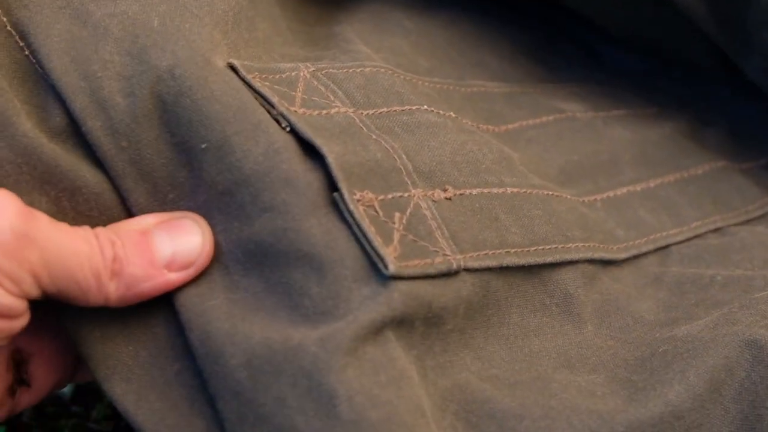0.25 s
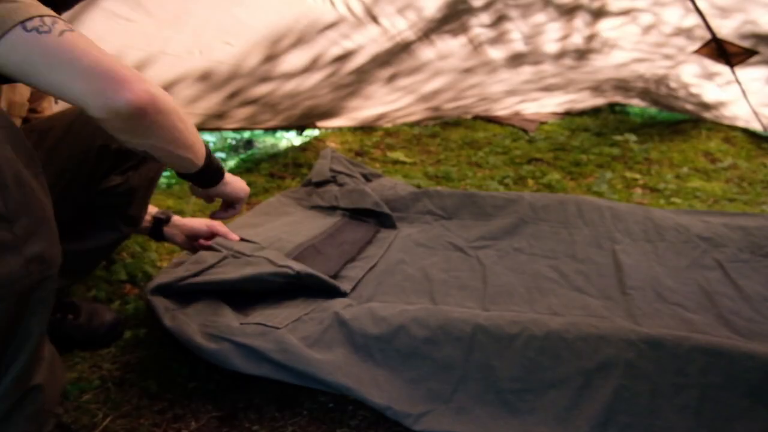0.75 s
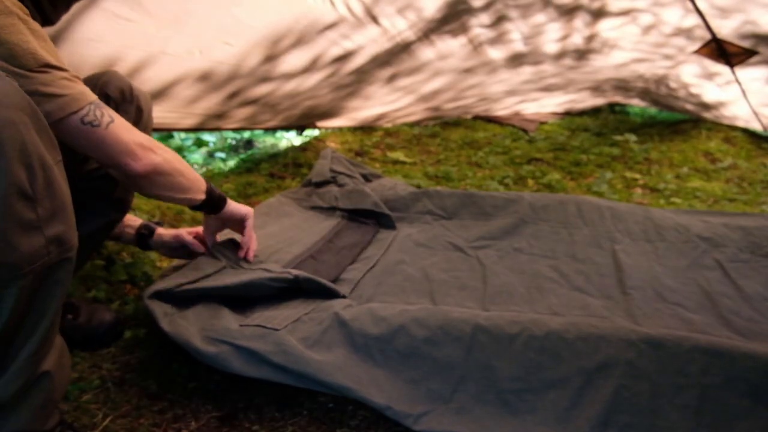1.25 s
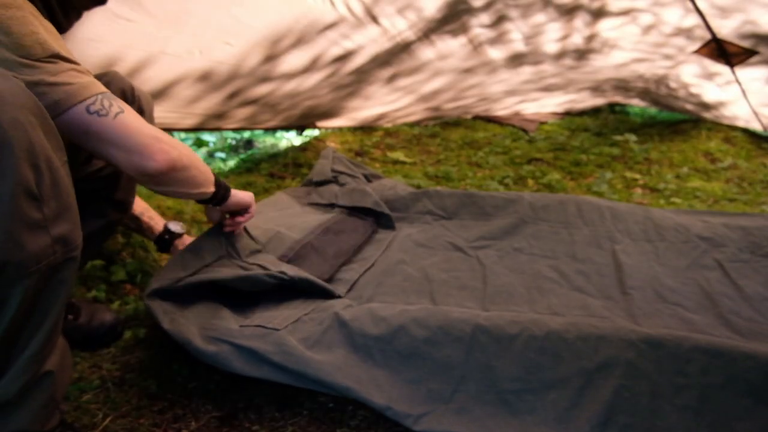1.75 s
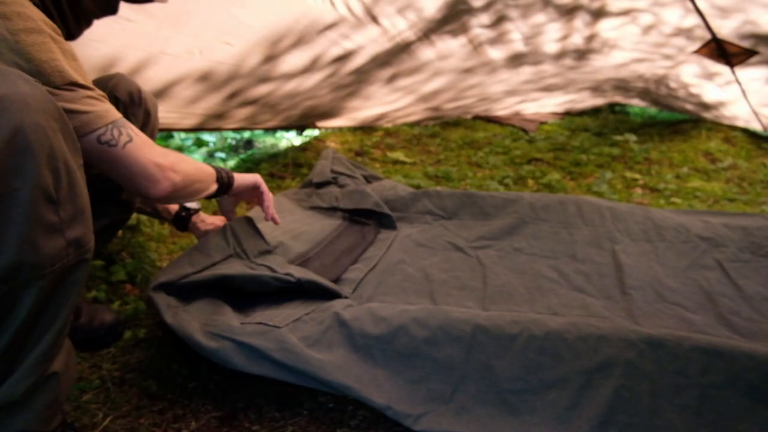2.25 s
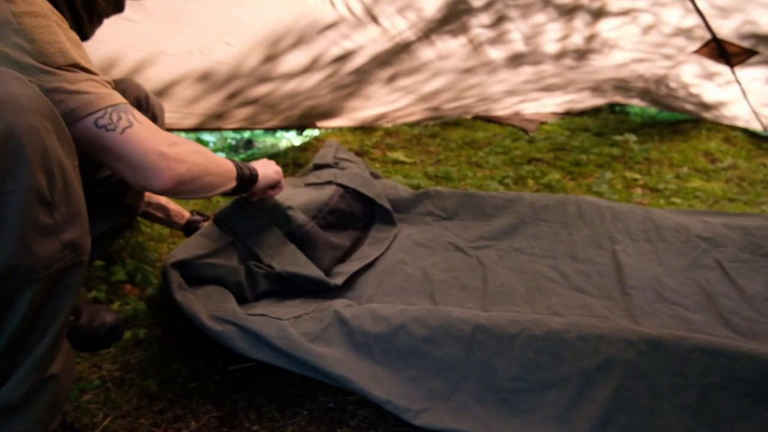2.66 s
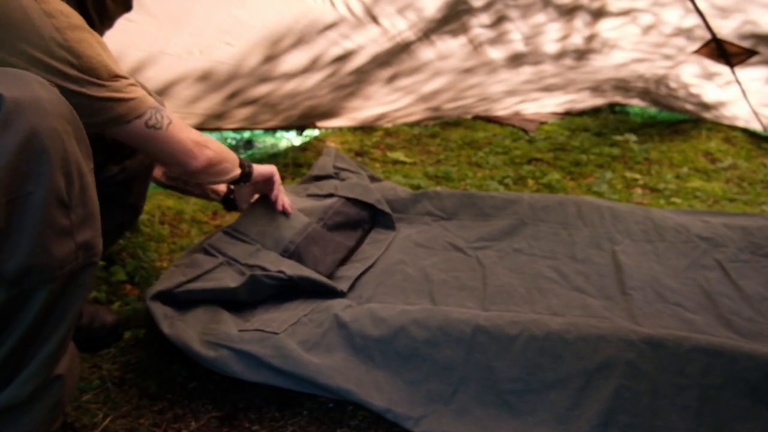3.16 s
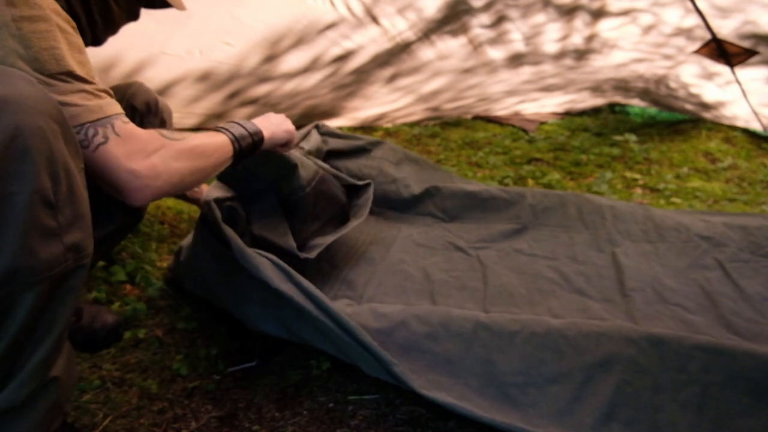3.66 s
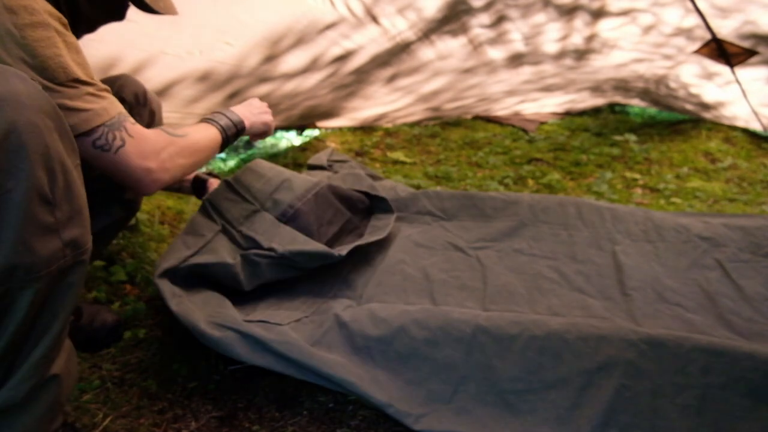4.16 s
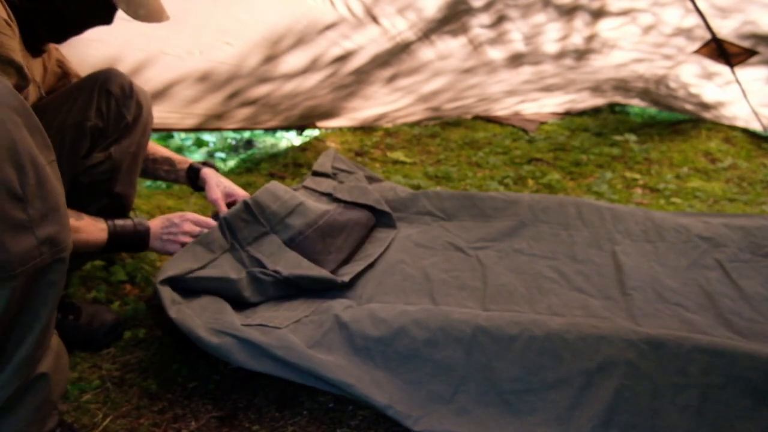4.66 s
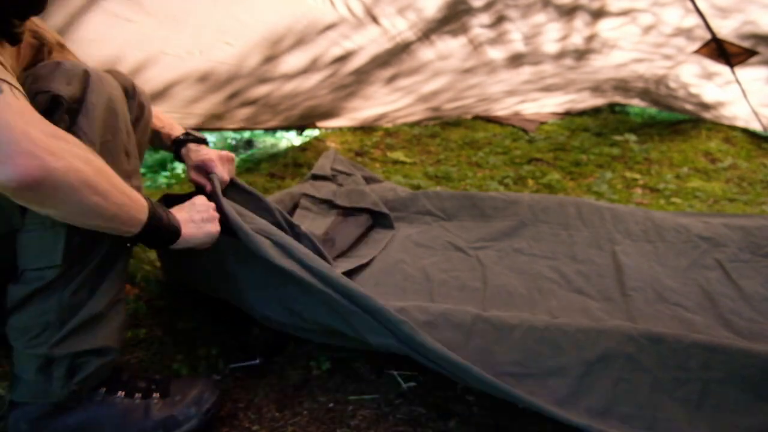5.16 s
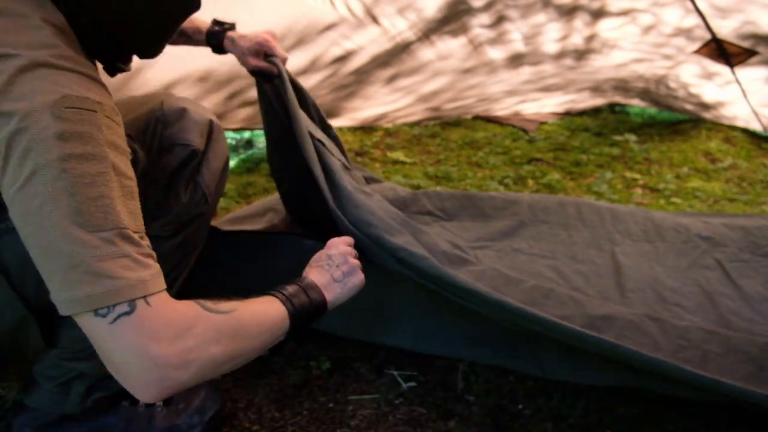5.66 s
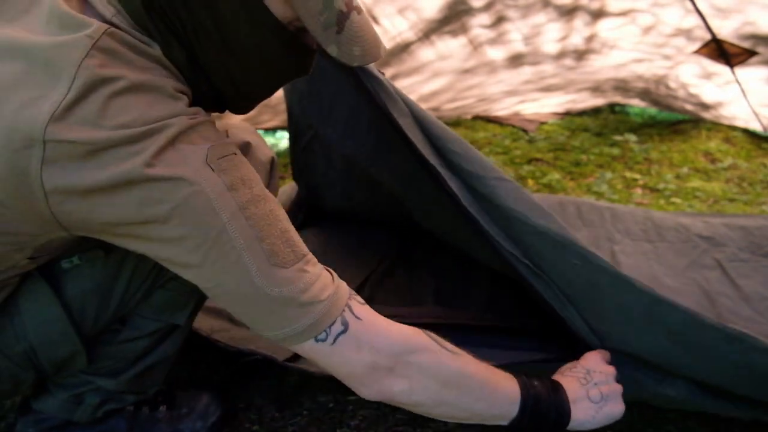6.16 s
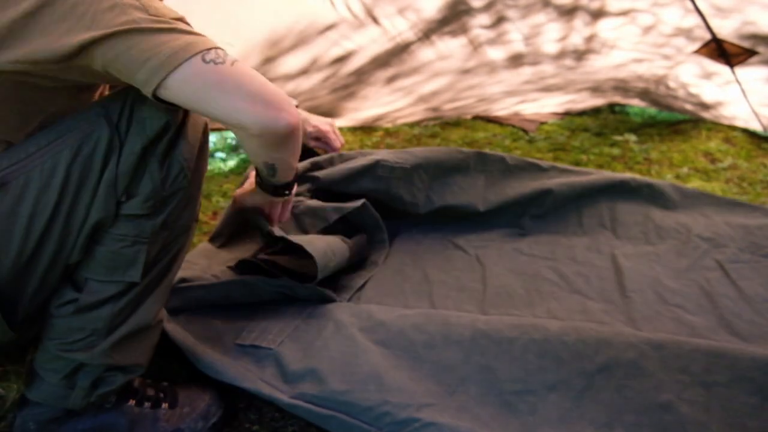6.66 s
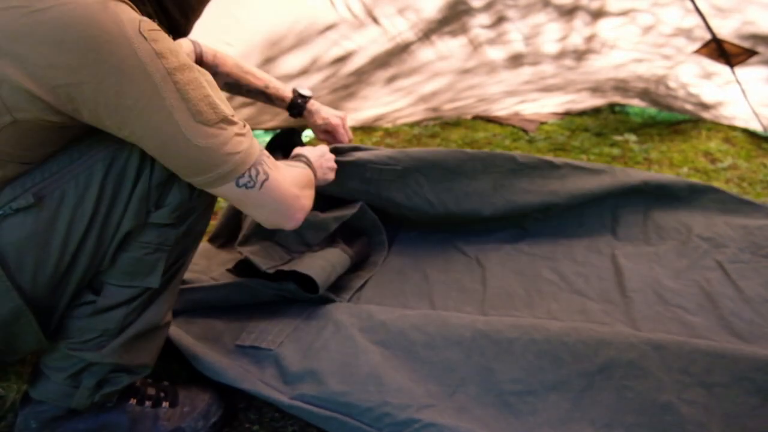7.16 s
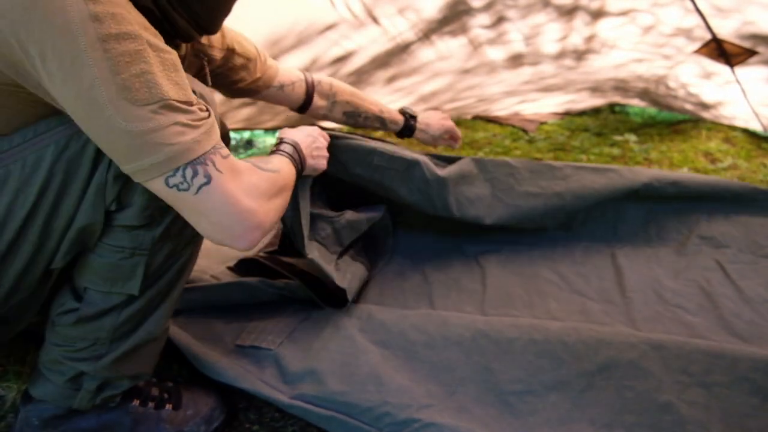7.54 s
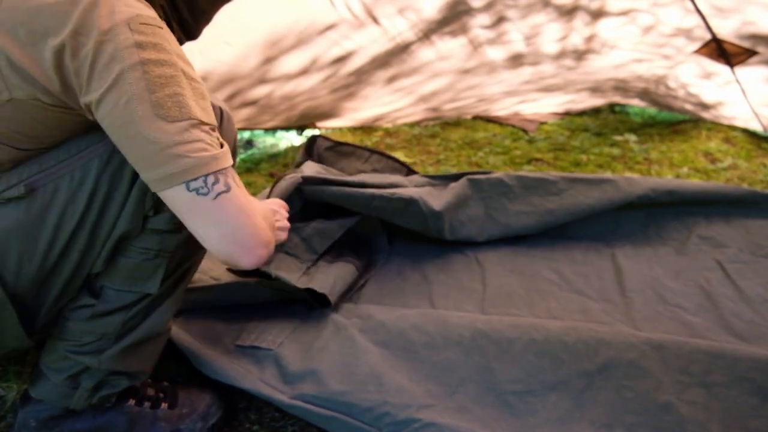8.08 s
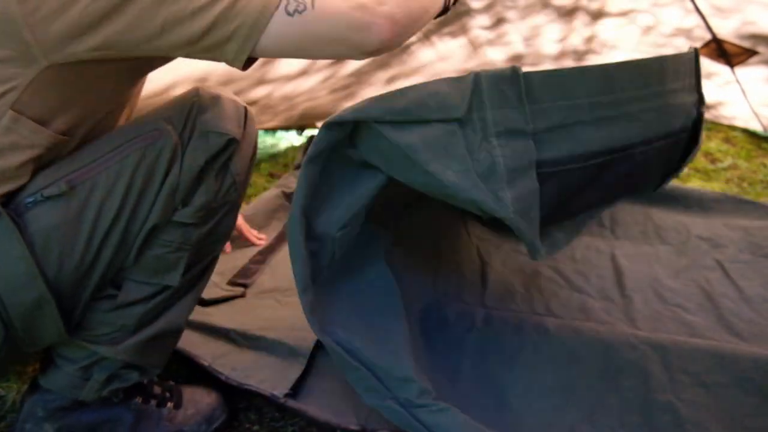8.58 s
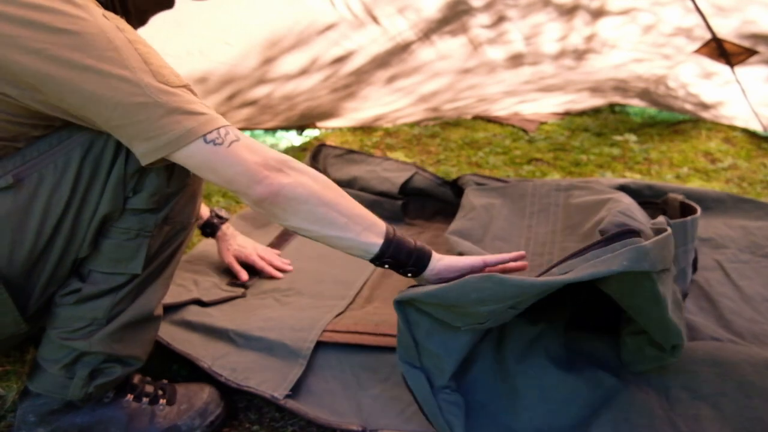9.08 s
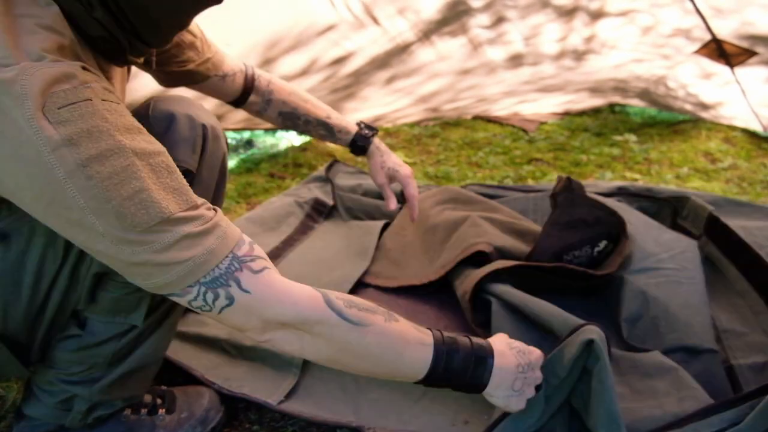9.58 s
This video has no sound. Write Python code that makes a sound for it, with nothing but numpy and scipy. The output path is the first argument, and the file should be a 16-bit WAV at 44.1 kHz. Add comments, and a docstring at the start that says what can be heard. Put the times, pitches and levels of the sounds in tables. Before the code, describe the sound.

Over a faint, even rush of outdoor air, hands work nearby on a canvas bedroll. Small scratchy crackles lead to three short hook-and-loop rips. The stiff cloth rustles and pops, and a metal zip tab ticks and rings. The zip then rasps along in four quick pulls, the last two softer. The flap flops over with a loud slap and thud, followed by a few lighter pats, all heard close up.

```python
'''A stiff canvas bedroll is opened by hand, close by, over a steady outdoor rush and rustling cloth.
First, hook-and-loop tabs are picked at and ripped open: snapping hooks shake the backing and cloth.
Next, a zip is run in four pulls, whining at its tooth rate while its metal tab is knocked and rings.
Last, the flap is thrown back and patted down with slaps and thuds.'''
import sys
import numpy as np
from scipy import signal
from scipy.fft import rfft, irfft, next_fast_len
from scipy.io import wavfile
from scipy.ndimage import uniform_filter1d, map_coordinates

SR = 44100
rng = np.random.default_rng(int(sys.argv[2]) if len(sys.argv) > 2 else 0)


def pcm_store(signal):
    """Save signal as 16-bit PCM."""
    levels = np.round(np.clip(np.atleast_2d(signal), -1, 1) * 32767)
    wavfile.write(sys.argv[1], SR, levels.astype(np.int16).T)


N = 432621

# Event levels are relative: each source adds its own offset and flicker.
# quiet handling: (time [s], level [dB])
RUSTLE_LEVELS = [(0, -43), (1.0, -38.5), (1.6, -40), (3.0, -37), (4.0, -40), (5.0, -37.5), (5.6, -40.5),
                 (6.9, -39.5), (7.5, -37), (8.0, -36.5), (8.65, -36), (9.4, -38)]
# folds flopping over: (time [s], slap [dB], thud [dB], rise [s], leftward pan of the slap [dB])
FOLD_FLOPS = [(3.515, -33, -34, 0.036, 0), (3.614, -44, -31, 0.0076, 14), (4.254, -43, -37.5, 0.002, 2),
              (7.626, -30.5, -42, 0.0054, -1), (8.275, -26, -46, 0.038, -2),
              (8.322, -14.5, -29, 0.0033, -1), (8.357, -16, -21, 0.018, 0), (8.717, -23.5, -37, 0.0022, -6),
              (8.73, -17, -30, 0.016, -4), (9.045, -26.5, -34, 0.024, -4), (9.615, -32, -41, 0.0045, -7)]
# short rasps: hands and cloth on canvas, and the slider stopping after the second pull:
# (time [s], duration [s], level [dB])
SHORT_RASPS = [(2.793, 0.075, -27.5), (2.839, 0.049, -27), (2.889, 0.024, -23), (3.733, 0.061, -34.5),
               (4.272, 0.029, -26), (4.312, .13, -34), (4.908, 0.17, -36), (5.07, 0.11, -38.5),
               (5.925, .032, -20.5), (6.309, 0.043, -27.5), (6.455, .05, -24), (7.056, 0.12, -31.5),
               (8.025, 0.15, -32.5), (8.38, 0.084, -27.5), (8.444, .1, -17), (8.668, 0.018, -26),
               (9.073, 0.022, -28.5), (9.62, 0.055, -37.5)]
# pops and ticks: creases buckling, and the sharp start of the last hook-and-loop rip:
# (time [s], pop [dB], treble tick [dB])
POPS_AND_TICKS = [(2.965, -18, -48), (3.201, -23.5, -18.5), (3.353, -16, -10), (3.364, -16, -5),
                  (3.904, -22.5, -26.5), (4.253, -13.5, -30), (4.848, -25.5, -52), (5.369, -9, -20),
                  (6.628, -28, -27), (6.732, -28, -26), (8.185, -19, -32), (8.32, -20, -32)]
# knocks on the metal tab: (time [s], ring [dB], highest mode [dB])
TAB_KNOCKS = [(2.9417, -38, -50), (3.6644, -35, -47), (3.7432, -32.5, -42), (3.7894, -36.5, -60),
              (3.909, -34, -55), (3.9348, -28.5, -47), (4.1994, -41, -50), (4.257, -29.5, -46),
              (5.254, -31, -29), (5.369, -31, -40), (5.8113, -25, -33), (5.9335, -29.5, -42),
              (6.3004, -34, -50), (6.46, -27, -50), (6.6283, -32, -57), (6.7351, -37, -57),
              (7.2696, -22, -48), (7.4071, -30, -52), (7.63, -32.5, -56), (7.6806, -33, -54),
              (7.7538, -40.5, -58), (8.509, -36, -50)]
# modes of the tab: (frequency [Hz], level [dB], t60 [s])
TAB_MODES = [(4000, 4, 0.13), (5800, -0.5, 0.15), (7950, -7.5, 0.081), (8990, 4.5, 0.085),
             (12300, -6, 0.16), (14500, 5, 0.15)]
# slider speed, one curve a pull: (time [s], speed [teeth/s])
SLIDER_SPEEDS = [
    [(5.175, 260), (5.205, 270), (5.228, 450), (5.25, 860), (5.295, 1180), (5.33, 730), (5.352, 620)],
    [(5.71, 310), (5.755, 470), (5.812, 1150), (5.84, 1120), (5.862, 960), (5.9, 920), (5.948, 390)],
    [(6.3, 420), (6.355, 560), (6.415, 1060), (6.462, 860), (6.52, 1060), (6.59, 410)],
    [(7.185, 700), (7.24, 850), (7.29, 1560), (7.355, 1340), (7.42, 960), (7.465, 376), (7.495, 270)],
]
# the same pulls: (whine [dB], tape rustle [dB], scrape [dB], mismatch of the tooth rows [0-1],
# timing scatter [tooth spacings], tooth share of the scrape before limiting [0-1])
SLIDER_PULLS = [(-22, -25, -17, 0.13, 0.044, 1), (-19.5, -26.5, -19, 0, 0.04, 0.8),
                (-27, -28.5, -29.5, 0.5, 0.076, 0.5), (-26.5, -30, -27, 0.79, 0.051, .5)]
# resonances of the zip tape, which swell the whine: (tooth rate [Hz], gain [dB])
TAPE_RESONANCES = [(250, -16), (420, -4), (650, -7), (900, -4), (1120, 1.5), (1500, 2)]
# small clumps of hooks letting go: (time [s], level [dB])
HOOK_NIPS = [(0.692, -13.5), (0.708, -10.5), (0.743, -13.5), (0.785, -13), (0.794, -7), (0.824, -19),
             (0.8415, -14.5), (0.8524, -20.5), (1.574, -5), (1.581, -9), (1.5964, -11), (1.6368, -6),
             (1.6462, -2), (1.667, -4), (2.417, -22), (2.461, -17)]
# hook-and-loop rips: (start [s], hardest pull [s], end [s], hooks [dB], backing [dB], cloth [dB],
# slack at the start [dB], slack at the end [dB])
HOOK_RIPS = [(1.636, 1.85, 2.0, -15, -27, -21.5, 9.5, 6.5), (2.507, 2.6, 2.702, -15, -23, -21.5, 12.5, 9.5),
             (2.696, 2.71, 2.738, -23, -33.5, -28.5, 11, 5.5),
             (3.348, 3.43, 3.642, -16, -19.5, -23.5, 2, 9)]

# spectra: (frequency [Hz], relative spectral density [dB])
AIR_SPECTRUM = [(20, -30), (40, -14.5), (65, -6.5), (130, -3), (250, -0.5), (340, -1), (450, 0), (700, 0.5),
                (1200, 0), (1700, -3), (2600, -10.5), (5000, -13.5), (15000, -41.5)]
WEAVE_SPECTRUM = [(800, -34), (2500, -1.5), (4600, 0), (6500, -4.5), (9000, -5.5), (12000, -15.5),
                  (16000, -20)]
SLAP_SPECTRUM = [(25, -26), (70, -13), (150, -26), (280, -8.5), (420, 4), (600, -2.5), (850, -1.5),
                 (1500, -4.5), (2800, -13.5), (5000, -14.5), (9000, -19.5), (14000, -31)]
THUD_SPECTRUM = [(20, -24), (60, -9), (130, 2.5), (240, 3.0), (500, -17), (1500, -60)]
RASP_SPECTRUM = [(60, -11), (200, -4.5), (500, -4), (1200, -2), (2400, -7.5), (4500, -4), (8000, -4.5),
                 (11000, -10.5), (15000, -18)]
POP_SPECTRUM = [(30, -35), (120, 4.5), (300, -8), (1300, 7), (3800, -14), (7000, -36)]
TICK_SPECTRUM = [(1500, -34), (2600, -3), (4200, 11.5), (6000, 1.5), (9000, -15), (15000, -18)]
KNOCK_SPECTRUM = [(500, -19), (4000, -14), (9000, 14), (15000, -10)]
TEETH_SPECTRUM = [(500, -29), (1200, -14), (1900, -2.5), (3200, -0.5), (5000, -3), (8000, -3),
                  (11000, -12.5), (15000, -15)]
TAPE_SPECTRUM = [(60, -15.5), (200, -2), (450, 0.5), (1100, 4), (2000, -1), (3000, -9.5), (6000, -32),
                 (14000, -42)]
SCRAPE_SPECTRUM = [(1200, -42), (2400, -10), (3200, 5.5), (5000, -0.5), (8000, 2), (10500, -2.5),
                   (15000, -14)]
HOOK_SPECTRUM = [(2500, -59), (4200, -7), (5200, 1), (6300, 2.5), (8500, 0.5), (10500, -4.5),
                 (13000, -11.5), (15500, -11)]
BACKING_SPECTRUM = [(1200, -21), (2200, -9), (3000, -2.5), (4200, 1.5), (5200, -5.5), (7500, -23.5)]
CLOTH_SPECTRUM = [(40, -41), (100, -20), (200, -13), (300, -7), (390, -14), (490, 0.5), (680, -7),
                  (970, 2.5), (1150, -5), (1330, 2), (1900, -6.5), (3200, -6), (6000, -44)]
NIP_SPECTRUM = [(100, -29), (500, -9), (1200, -8.5), (2200, -13.5), (4200, -9.5), (6200, 2), (8300, -4),
                (10500, -9.5), (15000, -22.5)]
# left-right likeness of direct and diffuse sound: (frequency [Hz], coherence [0-1])
DIRECT = [(60, 0.87), (300, 0.87), (1000, 0.94), (4000, 0.84), (15000, 0.71)]
DIFFUSE = [(60, 0.53), (200, 0.4), (640, 0.45), (1400, 0.35), (7000, 0.69), (15000, 0.62)]


def amp(db):
    '''Amplitude grows tenfold for every 20 dB.'''
    return 10 ** (np.asarray(db) / 20)


def unit(x):
    '''Normalisation to rms 1.'''
    return x / np.sqrt(np.mean(x ** 2) + 1e-20)


def along(points, hz):
    '''Interpolation of (frequency [Hz], value) points on a logarithmic axis.'''
    freqs, values = np.transpose(points)
    return np.interp(np.log(hz + 1), np.log(freqs + 1), values)


def clock():
    '''Uniform sampling: the time of each sample in seconds.'''
    return np.arange(N) / SR


def wobble(rate):
    '''Random modulation: a spline through rate Gaussian knots a second.'''
    knots = rng.standard_normal(int(N * rate / SR) + 4)
    return map_coordinates(knots, [np.arange(N) * rate / SR])


def filtered(x, response):
    '''Linear filtering: the spectrum is multiplied by a frequency response.'''
    size = next_fast_len(N + 8192)
    return irfft(rfft(x, size) * response(np.fft.rfftfreq(size, 1 / SR)), size)[..., :N]


def coloured(pair, spectrum, coherence=DIRECT):
    '''Partial coherence: two uncorrelated signals, as mid and side, give shaped stereo of rms 1.'''
    def response(hz):
        angle = np.arccos(np.clip(along(coherence, hz), -1, 1)) / 2
        return amp(along(spectrum, hz)) * np.array([np.cos(angle), np.sin(angle)])
    mid, side = filtered(pair, response)
    return unit(np.array([mid + side, mid - side]))


def snaps(rate, scatter_db, hiss):
    '''Shot noise: fibres snap at random moments with scattered sizes, over a fine hiss.'''
    sizes = (rng.random(N) < rate / SR) * amp(scatter_db * np.clip(rng.standard_normal(N), -2, 2))
    return unit(sizes * rng.choice([-1, 1], (2, N))) + hiss * rng.standard_normal((2, N))


def add(track, start, sound):
    '''Superposition: a sound joins the track at start seconds.'''
    part = track[round(start * SR):][:len(sound)]
    part += sound[:len(part)]


def bursts(rows):
    '''Linear rise and exponential decay for each (time [s], level [dB], rise [s], t60 [s]).'''
    gain, t = np.zeros(N), np.arange(SR // 2) / SR
    for start, db, rise, t60 in rows:
        add(gain, start, np.minimum(t / rise, 1) * amp(db - 60 * np.maximum(t - rise, 0) / t60))
    return gain


def gate(start, end, attack_s, release_s):
    '''Sustained excitation: the gain rises, holds from start to end, then decays exponentially.'''
    t = clock()
    return np.clip((t - start) / attack_s + 1, 0, 1) * np.exp(-np.clip((t - end) / release_s, 0, 20))


def outdoor_rush():
    '''Diffuse field: the steady rush of the woods is only partly coherent between left and right.'''
    return amp(-36 + 0.13 * wobble(3.8)) * coloured(rng.standard_normal((2, N)), AIR_SPECTRUM, DIFFUSE)


def cloth_rustle():
    '''Friction in the weave: light handling gives a faint, diffuse shot noise.'''
    gain = amp(np.interp(clock(), *np.transpose(RUSTLE_LEVELS)) - 2.5 + 1.55 * wobble(14))
    return gain * coloured(snaps(rate=900, scatter_db=4.0, hiss=1.9), WEAVE_SPECTRUM, DIFFUSE)


def short_rasps():
    '''Sliding friction: hands, cloth or the stopping slider give a rasp that bites, then eases off.'''
    sliding = np.zeros(N)
    for start, duration, db in SHORT_RASPS:
        progress = np.linspace(0, 1, int(duration * SR))
        add(sliding, start, amp(db) * np.minimum(progress * 8, 1) * np.sqrt(1 - progress))
    sliding *= amp(1.7 * wobble(90))
    return sliding * coloured(snaps(rate=6400, scatter_db=4.5, hiss=0.81), RASP_SPECTRUM)


def pops_and_ticks():
    '''Sudden release: a crease buckles, or the last rip starts, with a pop and a treble tick.'''
    crackle = snaps(rate=5700, scatter_db=3.5, hiss=1.0)
    pops = bursts([(start, db - 6.0, .001, .035) for start, db, _ in POPS_AND_TICKS])
    ticks = bursts([(start, db - 0.5, .001, .035) for start, _, db in POPS_AND_TICKS])
    return pops * coloured(crackle, POP_SPECTRUM), ticks * coloured(crackle, TICK_SPECTRUM)


def flops(t60=0.25):
    '''Damped impact: a heavy fold lands with a broadband slap and a low thud.'''
    landing = np.array([
        bursts([(start, db + side * pan / 2, rise, t60) for start, db, _, rise, pan in FOLD_FLOPS])
        for side in (1, -1)])
    landing *= amp(1.35 * wobble(110))
    slaps = landing * coloured(snaps(rate=4600, scatter_db=4, hiss=0.5), SLAP_SPECTRUM)
    thud_gain = bursts([(start, db, rise, t60) for start, _, db, rise, _ in FOLD_FLOPS])
    return slaps, thud_gain * coloured(rng.standard_normal((2, N)), THUD_SPECTRUM)


def handling():
    '''Superposition of handling sounds; a level difference sets thuds, pops and rasps to the right.'''
    slaps, thuds = flops()
    rasps = short_rasps()
    pops, ticks = pops_and_ticks()
    return (thuds + pops + rasps) * amp([[-.9], [.9]]) + slaps + ticks + cloth_rustle()


def fold_reflections(direct):
    '''Comb filtering: echoes off nearby folds shift with the hands, so the colour keeps changing.'''
    total = direct.copy()
    # small folds reflect only short waves
    treble = filtered(direct, lambda hz: hz ** 4 / (hz ** 4 + 2040.0 ** 4))
    for delay_s, gain in [(.0009, .24), (.0017, -.28), (.0027, .26)]:
        delayed = np.arange(N) - SR * (delay_s + .00016 * wobble(11))
        total += gain * np.array([map_coordinates(side, [delayed], order=3) for side in treble])
    return total * np.sqrt(np.sum(direct ** 2) / np.sum(total ** 2))


def metal_tab(longest_rebound_s=.05, rebound_loss_db=12.5):
    '''Modal vibration: each knock ticks and rings the tab, which rebounds twice against the slider.'''
    ring, t = np.zeros((2, N)), np.arange(SR // 4) / SR
    for start, db, high_db in TAB_KNOCKS:
        # where the tab is struck sets the balance of its modes
        balance = [(TAB_MODES[0][0], db - 7), (TAB_MODES[3][0], db), (TAB_MODES[-1][0], high_db)]
        for bounce in range(3):
            for hz, mode_db, t60 in TAB_MODES:
                struck_db = along(balance, hz) + mode_db + rng.normal(0, 2.7)
                fade = amp(struck_db - rebound_loss_db * bounce - 60 * t / t60)
                phase = 2 * np.pi * hz * rng.normal(1, 0.003) * t
                for side in ring:  # the dangling tab radiates differently to each side
                    add(side, start, fade * np.sin(phase + rng.normal(0, 1.0)))
            start += longest_rebound_s * rng.uniform(.5, 1)
    contact = bursts([(start, db + 0.5, .001, .04) for start, db, _ in TAB_KNOCKS])
    tick = contact * coloured(rng.standard_normal((2, N)), KNOCK_SPECTRUM)
    chatter = unit(.35 + wobble(420))  # rattling against the slider widens the spectral lines
    return tick + ring * chatter


def tooth_clicks(passed, span, mismatch, scatter):
    '''Quasi-periodic impulses: the slider strikes teeth of the left and right row in turn.'''
    tooth = np.arange(int(passed[-1]))
    timing_error, size_error = rng.standard_normal((1000, 2))[tooth].T
    position = np.interp(tooth + scatter * timing_error, passed, span)
    size = (1 + mismatch * (-1) ** tooth) * amp(2.0 * size_error)
    sample, fraction = position.astype(int), position % 1
    clicks = np.bincount(sample, size * (1 - fraction), N) + np.bincount(sample + 1, size * fraction, N)
    return unit(clicks[span] - clicks[span].mean())


def tape_ringing(clicks, t60=0.0053):
    '''Time-varying resonance: clicks ring in the tape, whose colour shifts as the slider travels.'''
    t = np.arange(SR // 200) / SR
    weights = np.array([wobble(60) for _ in range(10)])
    weights /= np.linalg.norm(weights, axis=0)
    responses = rng.standard_normal((10, len(t))) * amp(-60 * t / t60)
    ringing = sum(weight * signal.oaconvolve(clicks, response)[:N]
                  for weight, response in zip(weights, responses))
    return filtered(ringing, lambda hz: amp(along(TEETH_SPECTRUM, hz)))


def zipper(reference_hz=1000, tape_db_per_octave=5, scrape_db_per_octave=8.5, whine_fade_s=.045):
    '''Forced vibration: the tape whines at the tooth rate; rustle and scrape grow with speed.'''
    clicks, whine, tooth_share, tape, scrape = np.zeros((5, N))
    waver = 1 + .052 * wobble(190)  # the slider catches and slips, breaking up the whine
    tone_flicker, sub_flicker = unit(amp(4.5 * wobble(130))), unit(amp(5.5 * wobble(90)))
    for curve, pull in zip(SLIDER_SPEEDS, SLIDER_PULLS):
        whine_db, tape_db, scrape_db, mismatch, scatter, share = pull
        times, rates = np.transpose(curve)
        span = np.arange(int((times[0] - .02) * SR), int((times[-1] + .04) * SR))
        speed = np.interp(span / SR, times, rates)
        passed = np.cumsum(speed * waver[span]) / SR  # teeth passed so far
        clicks[span] = tooth_clicks(passed, span, mismatch, scatter)
        tooth_share[span] = np.clip(share, .4, .85)
        moving = gate(times[0], times[-1], attack_s=0.028, release_s=0.019)[span]
        octaves = np.log2(speed / reference_hz)
        tape[span] = moving * amp(tape_db + tape_db_per_octave * octaves)
        scrape[span] = moving * amp(scrape_db + scrape_db_per_octave * octaves)
        tone = tone_flicker[span] * np.cos(2 * np.pi * passed)
        # unequal rows add a subharmonic an octave lower, mostly at high speed
        sub_gain = mismatch * sub_flicker[span] * np.minimum(speed / reference_hz, 1)
        tone += sub_gain * np.cos(np.pi * passed)
        # the whine builds as the tape comes taut and fades as it slackens
        edge_s = np.minimum(span - span[0], span[-1] - span) / SR
        taut = np.clip(edge_s / whine_fade_s - .5, 0, 1)
        whine[span] = np.sqrt(2) * taut * amp(whine_db + along(TAPE_RESONANCES, speed)) * tone
    teeth = tape_ringing(clicks)
    teeth /= np.sqrt(np.mean(teeth[tooth_share > 0] ** 2))
    drag = snaps(rate=8000, scatter_db=3.5, hiss=0.74)
    rasp = np.sqrt(tooth_share) * teeth + np.sqrt(1 - tooth_share) * coloured(drag, SCRAPE_SPECTRUM)
    rustle = amp(2.55 * wobble(120)) * tape * coloured(drag, TAPE_SPECTRUM)
    return whine + rustle + amp(1.9 * wobble(70)) * scrape * rasp


def hook_and_loop():
    '''Elastic release: hooks snap free and shake backing and cloth, more so the harder the pull.'''
    hooks, backing, cloth = np.zeros((3, N))
    for start, hardest, end, hook_db, backing_db, cloth_db, first_db, last_db in HOOK_RIPS:
        # the pull stays near its hardest, then falls away towards the ends
        away = np.interp(clock(), [start, hardest, end], [1, 0, 1])
        slack_db = away ** 2.7 * np.where(clock() < hardest, first_db, last_db)
        peeling = gate(start, end, attack_s=0.0057, release_s=0.0074)
        hooks += peeling * amp(hook_db - 0.94 * slack_db)
        backing += peeling * amp(backing_db - slack_db)
        cloth += peeling * amp(cloth_db - 1.75 * slack_db)
    tearing = snaps(rate=7000, scatter_db=4.5, hiss=0.61)
    clumps = unit(amp(1.2 * wobble(240) + wobble(80)))
    # each clump of hooks sits elsewhere on the tape, so the colour flickers
    rip = amp(2.5 + 0.64 * wobble(200)) * hooks * coloured(tearing, HOOK_SPECTRUM)
    rip += amp(0.5 + 2.4 * wobble(150)) * backing * coloured(tearing, BACKING_SPECTRUM)
    rip += amp(-1.0 + 2.9 * wobble(90)) * cloth * coloured(tearing, CLOTH_SPECTRUM)
    nip_gain = bursts([(start, db - 6.5, .002, .045) for start, db in HOOK_NIPS])
    nips = nip_gain * coloured(snaps(rate=7500, scatter_db=-2.5, hiss=1.0), NIP_SPECTRUM)
    return clumps * rip + nips


def scene():
    '''Path difference: the canvas is nearer the left microphone, so its sound arrives there first.'''
    lead_s = 30e-6
    near = fold_reflections(hook_and_loop() + zipper() * amp([[-.4], [.4]]) + handling())
    near = filtered(near, lambda hz: np.exp(1j * np.pi * hz * lead_s * np.array([[1], [-1]])))
    return near + metal_tab() + outdoor_rush() * amp([[-.3], [.3]])


def record(dry):
    '''Compression: gain drops on loud sounds and slowly recovers; soft clipping and a low-pass follow.'''
    threshold_db, cut_share, recovery_db_per_s, top_hz = -22, 0.31, 13.5, 16000
    power = uniform_filter1d(np.mean(dry ** 2, axis=0), size=700)
    excess_db = np.maximum(10 * np.log10(np.abs(power) + 1e-12) - threshold_db, 0)
    recovery = recovery_db_per_s * clock()
    cut_db = np.maximum.accumulate(cut_share * excess_db + recovery) - recovery
    held = dry * amp(-cut_db)
    rounded = held / (1 + np.abs(held / .9) ** 4) ** (1 / 4)
    return filtered(rounded, lambda hz: hz < top_hz)


dry = scene()
out = record(dry)
pcm_store(out)
```